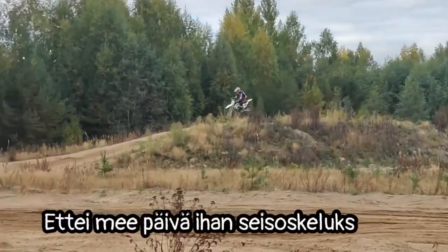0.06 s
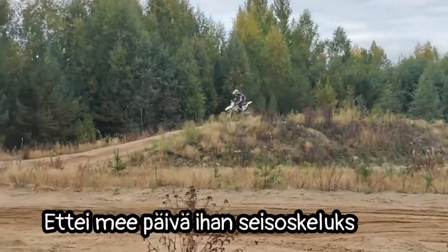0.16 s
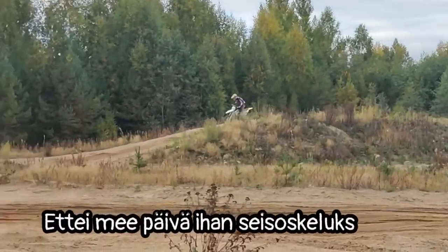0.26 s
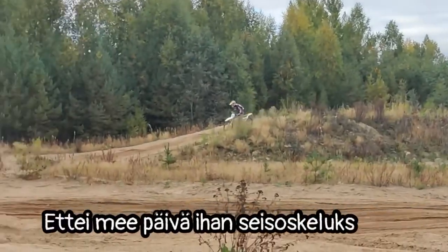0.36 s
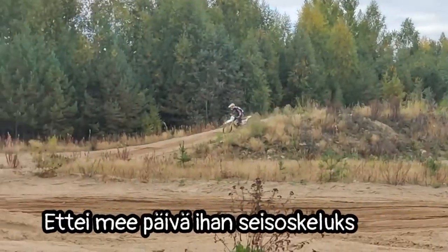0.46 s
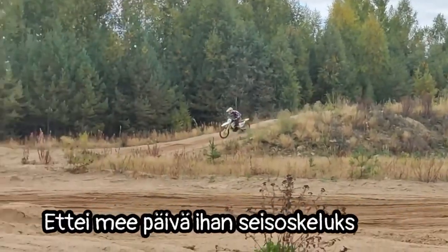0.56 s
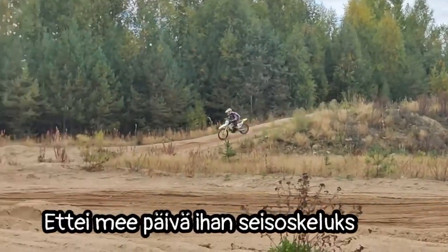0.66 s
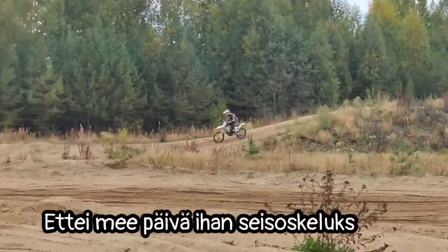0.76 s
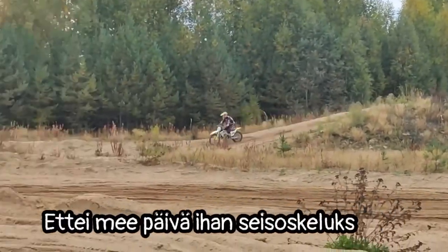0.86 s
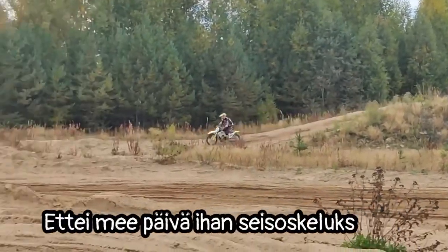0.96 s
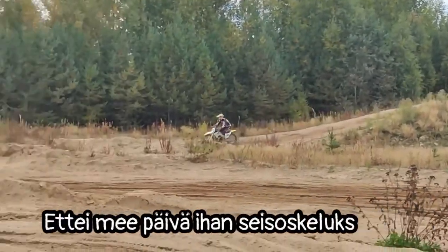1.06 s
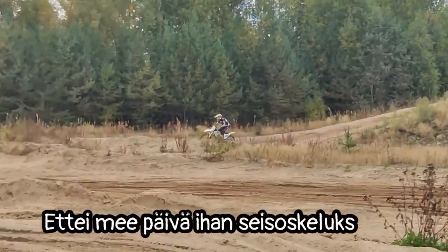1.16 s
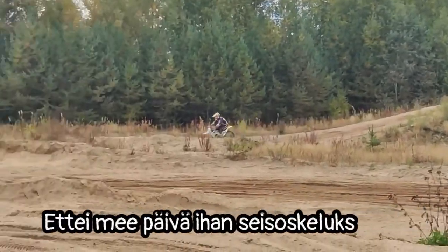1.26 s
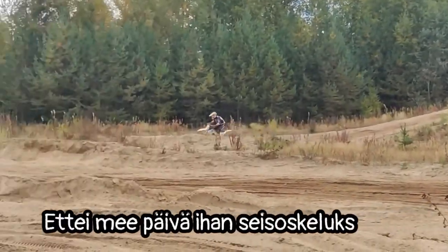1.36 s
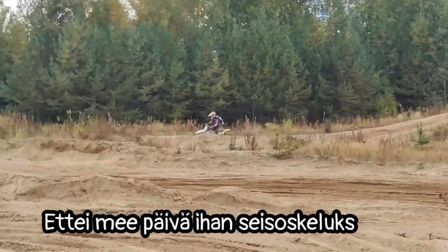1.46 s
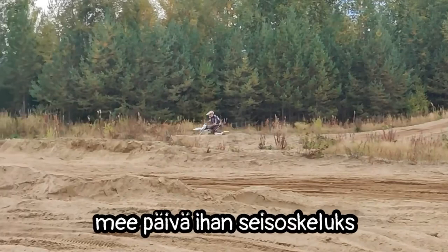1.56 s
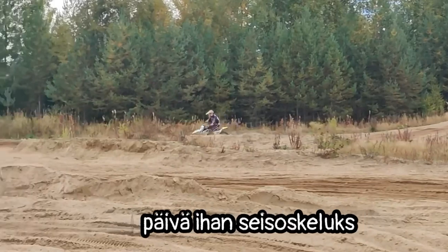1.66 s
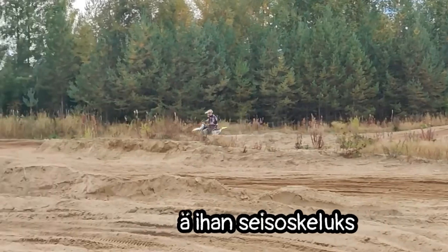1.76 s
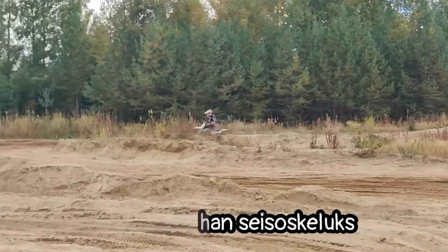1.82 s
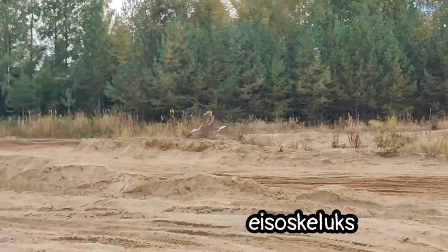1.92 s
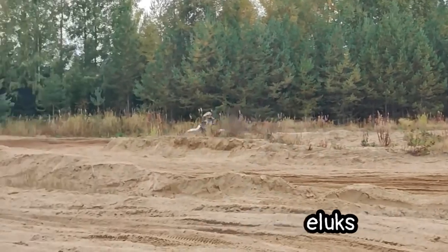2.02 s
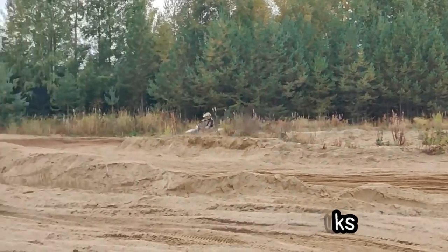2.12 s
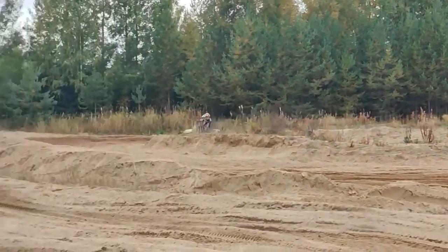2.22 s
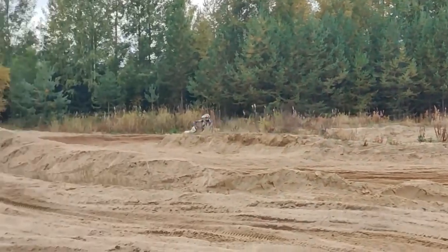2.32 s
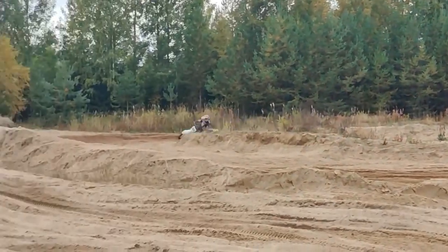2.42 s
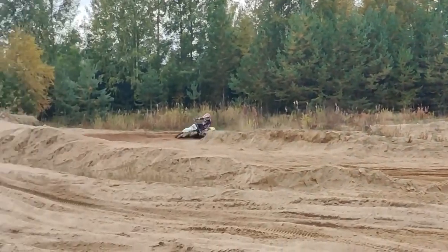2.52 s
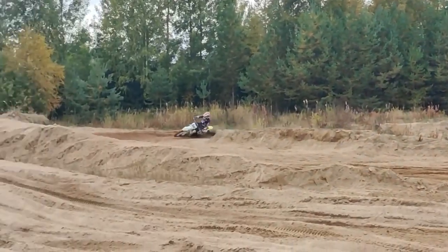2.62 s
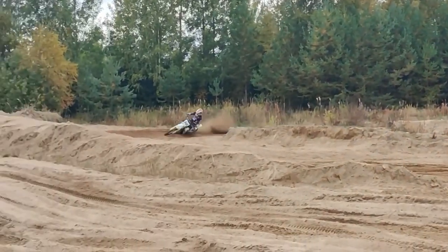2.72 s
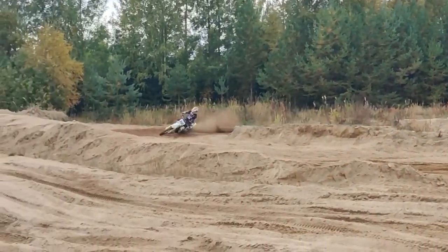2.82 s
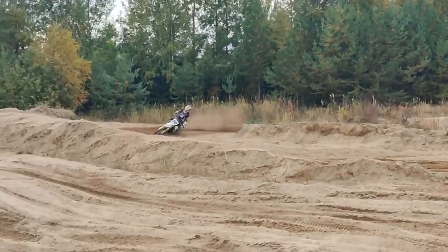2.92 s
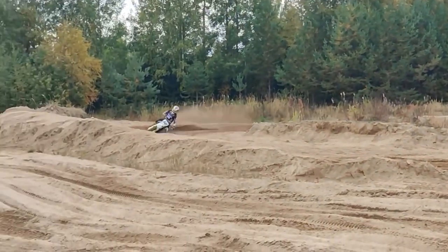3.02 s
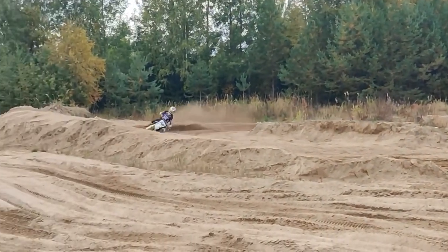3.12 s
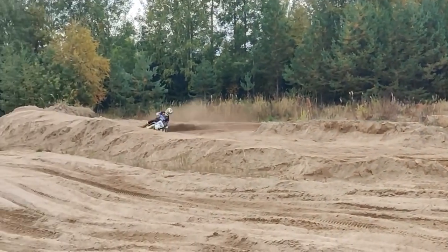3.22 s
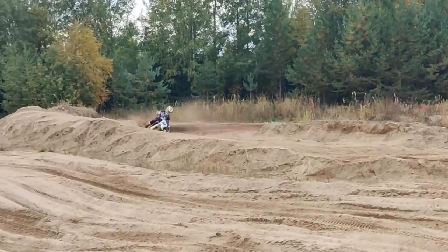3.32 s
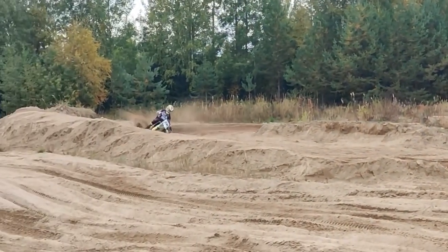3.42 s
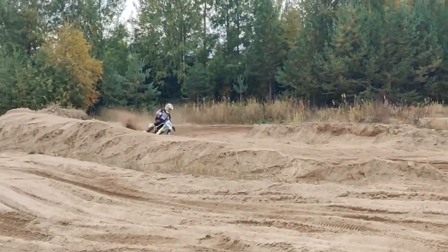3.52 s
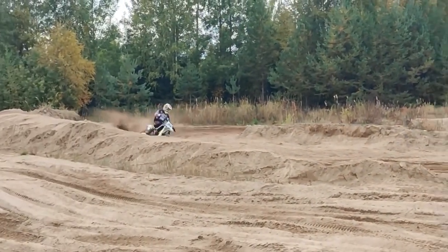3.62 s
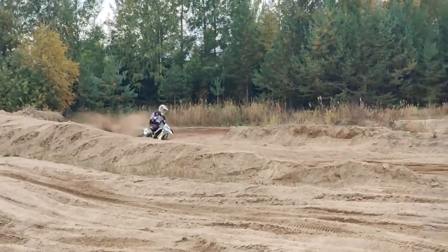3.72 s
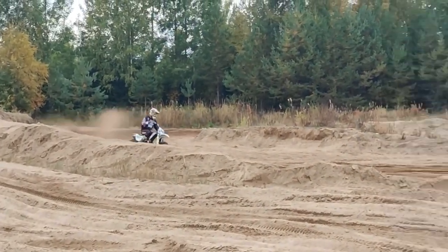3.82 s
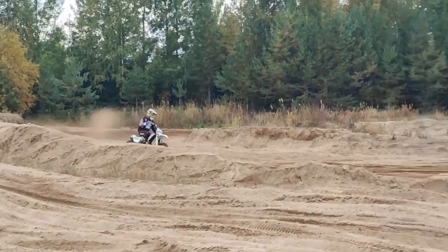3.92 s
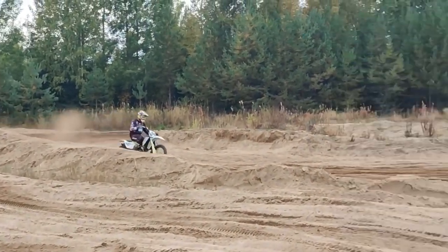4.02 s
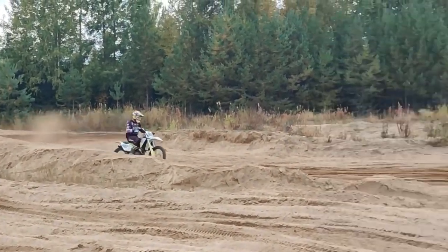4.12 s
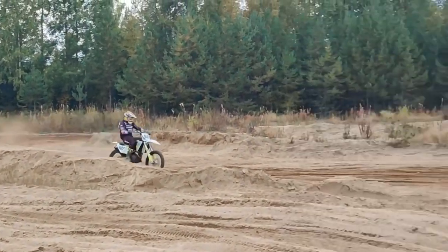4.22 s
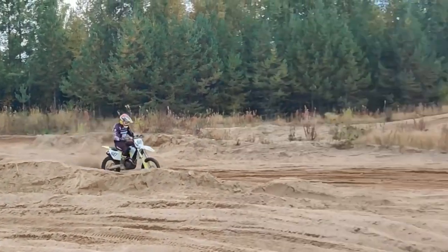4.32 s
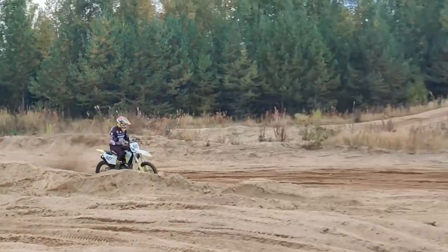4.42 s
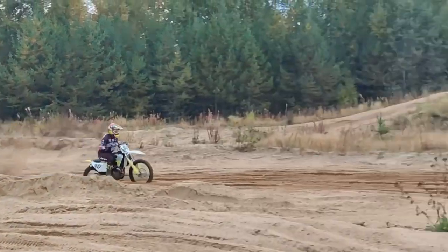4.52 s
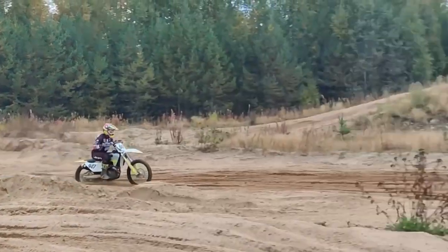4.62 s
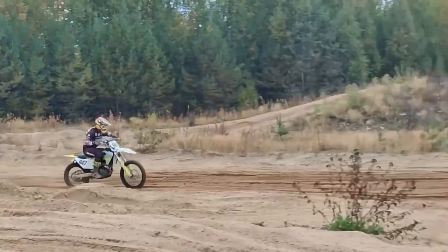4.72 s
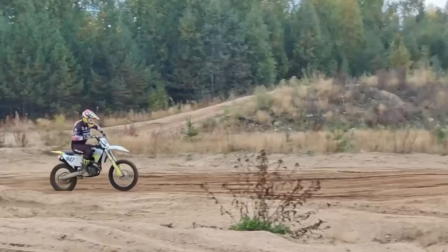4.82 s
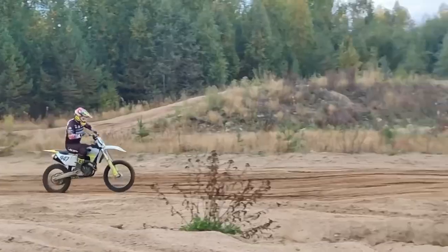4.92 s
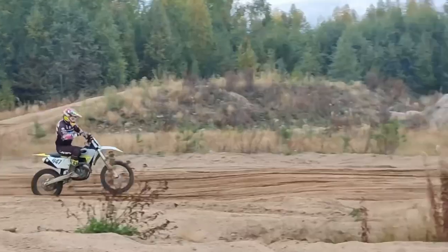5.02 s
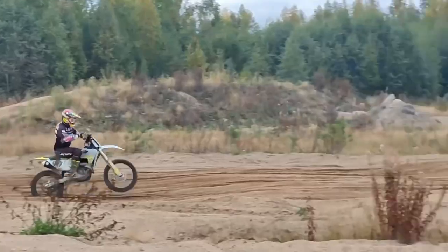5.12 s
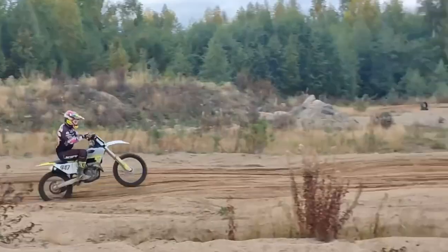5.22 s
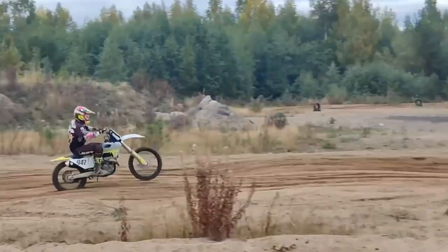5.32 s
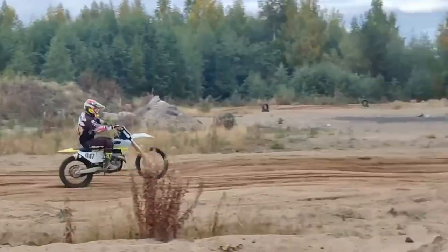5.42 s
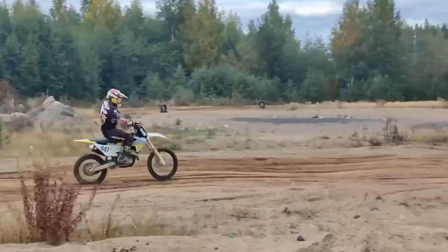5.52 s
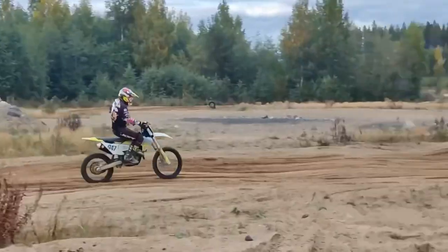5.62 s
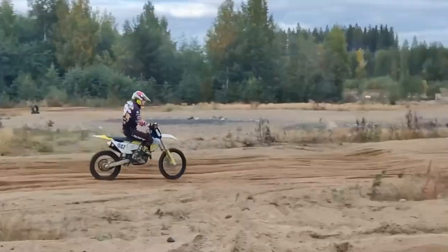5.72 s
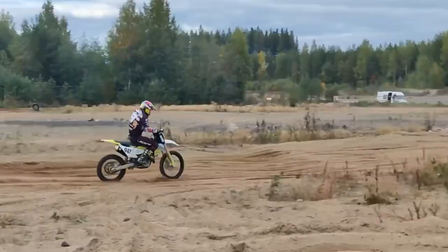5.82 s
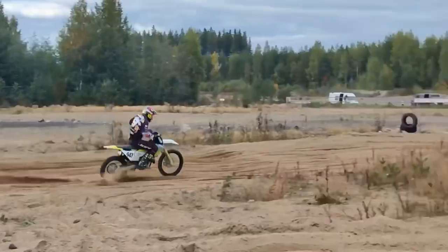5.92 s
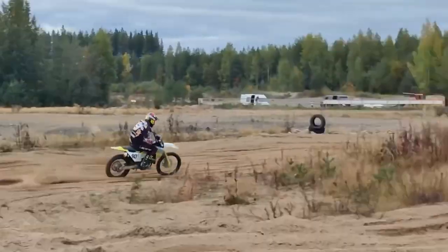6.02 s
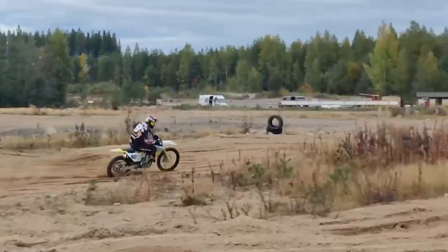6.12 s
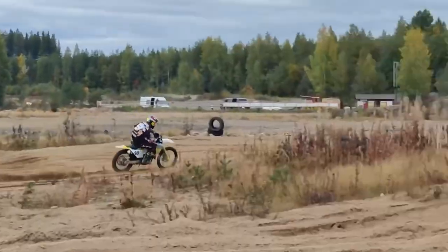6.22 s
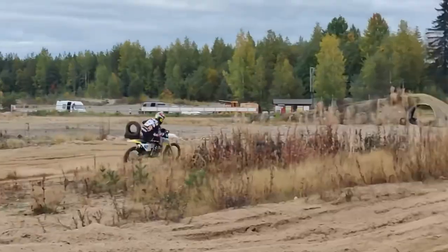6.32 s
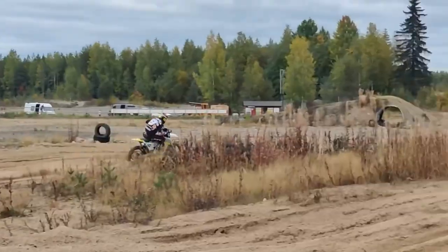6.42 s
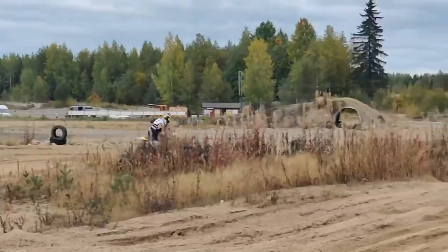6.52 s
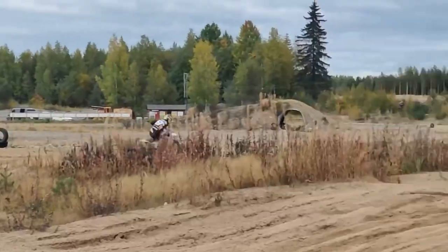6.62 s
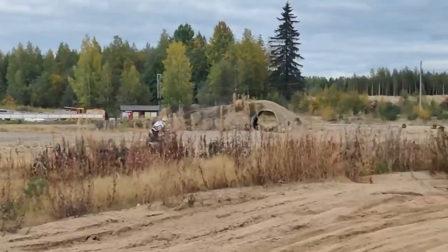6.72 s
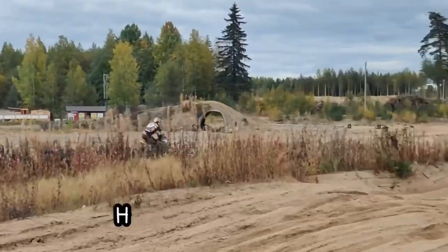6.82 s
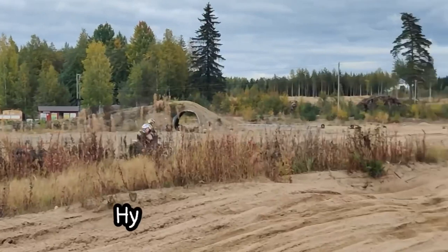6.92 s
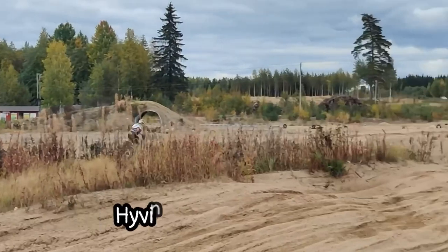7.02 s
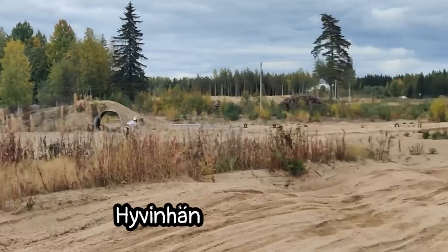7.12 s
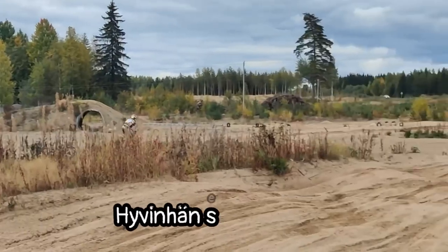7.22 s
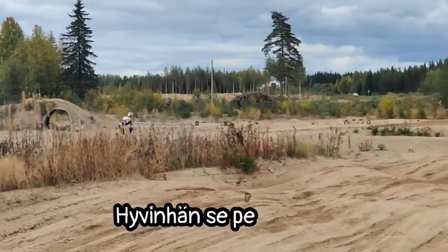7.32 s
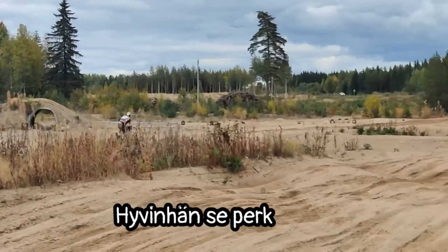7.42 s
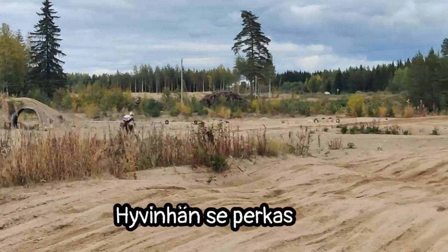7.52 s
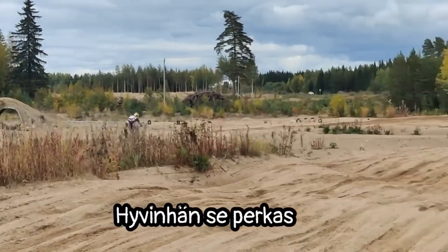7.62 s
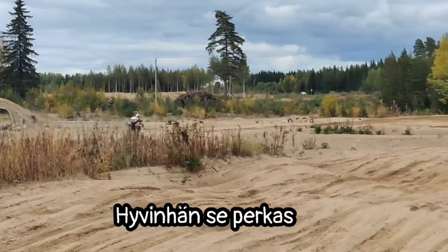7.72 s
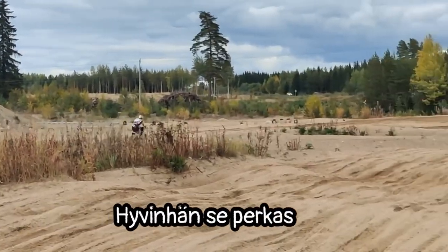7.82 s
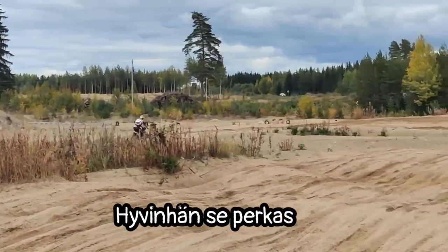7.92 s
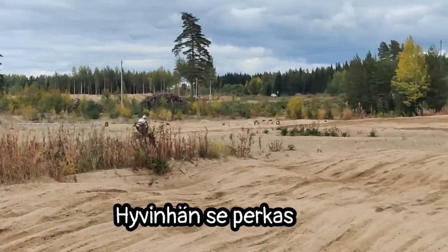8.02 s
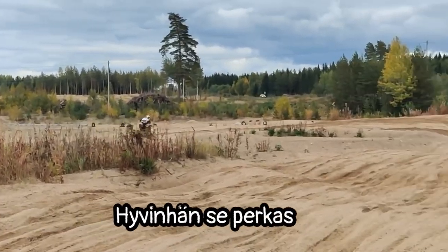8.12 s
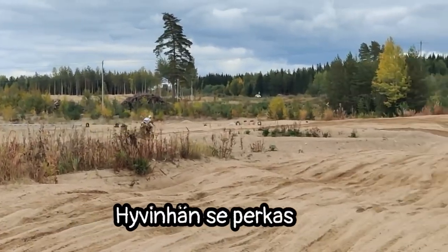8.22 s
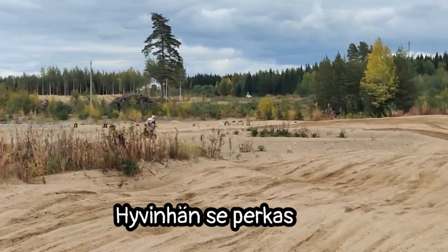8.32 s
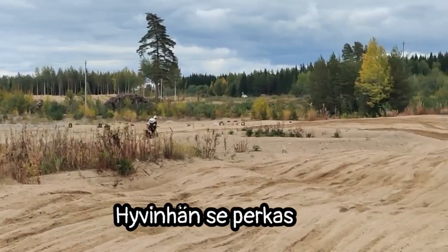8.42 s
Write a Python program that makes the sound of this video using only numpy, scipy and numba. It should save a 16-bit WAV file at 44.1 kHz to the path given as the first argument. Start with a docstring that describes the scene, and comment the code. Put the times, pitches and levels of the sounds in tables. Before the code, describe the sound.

A four-stroke dirt bike laps a sand track, revving in bursts, burbling off the throttle, passing by and riding away.

```python
"""Dirt bike on a sand track

A single-cylinder four-stroke laps tens of metres from a phone that pans after it. Each firing gives
a low exhaust boom, a sharp bark and a puff of gas; at full revs the limiter cuts sparks. Chain and
tyres hiss, the tree line echoes, and a light wind rumbles on the two microphone ports."""
import sys
import numpy as np
from scipy import signal
from scipy.fft import rfft, irfft, next_fast_len
from scipy.io import wavfile
from scipy.ndimage import uniform_filter1d
from numba import njit

SR = 44100
rng = np.random.default_rng(int(sys.argv[2]) if len(sys.argv) > 2 else 0)


def inscribe(sig):
    """Save sig as 16-bit PCM at rate SR to the path in sys.argv[1].

    A 1-D sig is mono; a 2-D sig holds one channel per row.
    Samples are clipped to [-1, 1] before scaling.
    """
    pcm = np.round(np.clip(np.atleast_2d(sig).T, -1, 1) * 32767)
    wavfile.write(sys.argv[1], SR, pcm.astype(np.int16))


N = 373086
TIME_S = np.arange(N) / SR
LIGHT_THROTTLE = .3  # opening at which the engine just pulls


def undb(db):
    """Decibels to gain."""
    return 10 ** (np.asarray(db) / 20)


def unit(x):
    """Scale to rms 1."""
    return x / np.sqrt(np.mean(x ** 2))


def curve(table):
    """The columns after time_s, interpolated to one value a sample."""
    time_s, *columns = np.transpose(table)
    return [np.interp(TIME_S, time_s, column) for column in columns]


def band(x, hz, width_hz):
    """Steep band-pass, gain 1 at the centre."""
    edges_hz = [hz - width_hz / 2, hz + width_hz / 2]
    return signal.sosfilt(signal.butter(2, edges_hz, "bandpass", fs=SR, output="sos"), x)


def wander(rate_hz):
    """Random levels held 1 / rate_hz seconds and smoothed twice; spread near 1."""
    hold, coarse = int(SR / rate_hz / 32), np.arange(0, N + 32, 32)
    held = np.repeat(rng.standard_normal(len(coarse) // hold + 1), hold)
    smooth = uniform_filter1d(uniform_filter1d(held, hold), hold)
    return 1.37 * np.interp(np.arange(N), coarse, smooth[:len(coarse)])


def port_noise(alike):
    """Noise on both microphone ports, with the share `alike` of its power in common."""
    return np.sqrt(alike) * rng.standard_normal(N) + np.sqrt(1 - alike) * rng.standard_normal((2, N))


def resonate(x, modes, wander_db=1.6):
    """Resonances that each swell and fade on their own; neighbours swing against each other."""
    return unit(sum((-1) ** k * undb(db + wander_db * wander(15)) * band(x, hz, width_hz)
                    for k, (hz, width_hz, db) in enumerate(modes)))


@njit
def moving_band(x, tuning, damping):
    """State-variable band-pass with a moving centre, gain 1 there."""
    out, band_state, low_state = np.empty(len(x)), 0., 0.
    for i in range(len(x)):
        g = tuning[i]
        passed = (band_state + g * (x[i] - low_state)) / (1 + g * (g + damping[i]))
        band_state = 2 * passed - band_state
        low_state += 2 * g * passed
        out[i] = damping[i] * passed
    return out


def sliding_ring(x, hz, width_hz):
    """Steep moving resonance on both ports."""
    tuning, damping = np.tan(np.pi * hz / SR), width_hz / hz
    return np.array([moving_band(moving_band(port, tuning, damping), tuning, damping) for port in x])


# Wind at the microphone: time_s, level_db
WIND_LEVEL = [(0, -32), (.9, -41), (1.2, -44), (2.7, -46), (3.7, -32), (4.7, -34), (5.1, -50), (6.4, -50),
              (7.3, -40), (7.8, -35), (8.46, -38)]
def wind():
    """Gusts rumble on the ports, only partly alike on the two."""
    return undb(curve(WIND_LEVEL)[0] + 4 * wander(6)) * unit(band(port_noise(.15), 32, 43))


def tree_echo(x, t60_s=.5, level_db=-14):
    """The tree line scatters back a decaying tail without bass, different at each port."""
    t = TIME_S[:SR // 2]
    tail = rng.standard_normal((2, N))[:, :len(t)] * np.exp(-np.log(1000) * t / t60_s) * (t > .02)
    tail /= np.sqrt(np.sum(tail ** 2, axis=1, keepdims=True))
    return undb(level_db) * signal.fftconvolve(x, band(tail, 2900, 5300), axes=1)[:, :N]


def ground_echo(x, gain, lag_s=.00146):
    """The dirt between bike and microphone adds a mirror image with a drifting lag."""
    samples = np.arange(N)
    delayed = samples - lag_s * (1 + .05 * wander(5)) * SR
    mirrored = np.array([np.interp(delayed, samples, port) for port in x])
    return (x + gain * mirrored) / np.hypot(1, gain)


# Top treble, dull when the bike is far off: time_s, over_hiss_db
TREBLE_LEVEL = [(0, -37), (1, -38.5), (2.2, -25.5), (3.3, -32), (4.7, -23), (5.6, -24.5), (6.8, -26.5),
                (7.2, -30), (8.46, -28.5)]
def top_treble(air, hiss_db):
    """The flickering top of the hiss, around 9 kHz."""
    level_db = hiss_db + curve(TREBLE_LEVEL)[0] + 2.2 * wander(14)
    return undb(level_db) * unit(band(air + .5 * rng.standard_normal((2, N)), 9300, 5400))


# Bands of the chain and tyre hiss: pitch_hz, width_hz, level_db
HISS_BANDS = [(2990, 1630, 10), (3830, 1200, 4.5), (6275, 1290, 1.5)]
def chain_and_tyres(air, rasp_hz, rasp_db):
    """Chain and tyres hiss in three steady bands and one sliding rasp."""
    hiss = resonate(air, HISS_BANDS)
    rasp = unit(sliding_ring(air, rasp_hz, width_hz=1500))
    return unit(undb(-rasp_db / 2) * hiss - undb(rasp_db / 2) * rasp)


def gas_puffs(clicks, crack, gate, load, lower_hz, upper_hz, balance_db):
    """Each puff of gas sounds two rings of the tail pipe over a broad rush."""
    blast = 2.8 * crack * clicks + .42 * gate * port_noise(.7)
    lower = undb(1.6 * wander(5.8) + balance_db / 2) * sliding_ring(blast, lower_hz, width_hz=520)
    upper = undb(1.6 * wander(5.8) - balance_db / 2) * sliding_ring(blast, upper_hz, width_hz=420)
    rush = unit(band(1.3 * crack * clicks + gate * port_noise(.7), 2000, 1300))
    return unit(unit(lower - upper) + (.7 - .4 * load) * rush)


def silencer_chambers(x, lags_s=(.0006, .0014), gain=.45):
    """The chambers repeat each pressure front as all-pass echoes, spreading it over a few ms."""
    for lag_s in lags_s:
        taps = np.zeros(int(lag_s * SR) + 1)
        taps[0], taps[-1] = -gain, 1
        x = signal.lfilter(taps, taps[::-1], x)
    return x


# Lower and upper resonances of the silencer: pitch_hz, width_hz, level_db
SILENCER_LOW = [(468, 267, -7), (665, 186, 4)]
SILENCER_HIGH = [(889, 710, -2.5), (1270, 240, 3)]
def exhaust_bark(clicks, bare_fronts, crack, gate, tilt_db, notch_hz=547, spike_db=-2):
    """Pressure fronts ring the silencer, thinned at its first notch; the bare front adds a spike."""
    front = (.15 + 1.7 * crack) * clicks + .33 * gate * port_noise(.75)
    lower = undb(-tilt_db / 2) * resonate(front, SILENCER_LOW)
    upper = undb(tilt_db / 2) * resonate(front, SILENCER_HIGH)
    bark = unit(lower + upper)
    bark = .45 * bark + .55 * signal.lfilter(*signal.iirnotch(notch_hz, 7, SR), bark)
    return bark + undb(spike_db) * unit(band(bare_fronts, 1700, 2200))


# What the pipe passes on shut, barely open and wide open throttle: pitch_hz, level_db
PIPE_SHUT = [(40, -43.5), (60, -39), (85, -27), (110, -25.5), (134, -21), (156, -26), (180, -33.5),
             (210, -38), (260, -41), (330, -39.5), (500, -63.5)]
PIPE_LIGHT = [(40, -34), (55, -26), (70, -22), (95, -24.5), (120, -24.5), (150, -29), (190, -42),
              (240, -40), (300, -41.5), (370, -33), (500, -39)]
PIPE_OPEN = [(40, -48.5), (60, -28), (90, -19), (118, -19), (138, -7.5), (160, -19.5), (185, -12.5),
             (230, -14), (300, -13.5), (350, -21), (400, -30), (460, -46), (500, -33)]
# A dip in the open-throttle boom, probably the echo off the ground: time_s, pitch_hz, depth_db
PATH_DIP = [(0, 195, 21), (1, 183, 15.5), (2.5, 320, 6), (3.7, 360, 17), (4.05, 331, 21.5), (4.4, 291, 4.5),
            (4.75, 248.2, 16), (5.45, 226.1, 28), (5.7, 226, 6.5), (6.8, 194, 1.5), (7.2, 221.7, 22),
            (8.46, 218.6, -5)]
# Lift of the first order over the rest of the boom: time_s, level_db
FIRST_ORDER_LIFT = [(0, -3), (.9, -2.5), (1.2, 6), (2.4, 5.5), (3.1, 1), (3.7, 0), (4.7, 1.5), (5.2, 0),
                    (6.8, 2), (7.1, 1), (7.55, 3), (7.7, 1), (8.2, 3), (8.35, 6), (8.46, 0)]
# Lag behind the firing of orders 1, 2, 3 and all higher ones, each in its own cycle: lag_turns
ORDER_LAG = [-0.062, -0.064, 0.18, 0.083]
def exhaust_boom(firing_hz, turns, load, limiting, dip_octaves=.31):
    """Clean low orders of the firing rate, each as strong as the pipe passes its pitch."""
    boom, slow = 0, slice(0, N, 32)  # levels move slowly
    dip_hz, dip_db = np.array(curve(PATH_DIP))[:, slow]
    first_db = (curve(FIRST_ORDER_LIFT)[0] - 3 * limiting)[slow]  # weaker while sparks are cut
    pulling = np.clip(load[slow] / LIGHT_THROTTLE, 0, 1)
    wide = np.clip((load[slow] - LIGHT_THROTTLE) / (1 - LIGHT_THROTTLE), 0, 1)
    for order in range(1, 11):
        pitch_hz = order * firing_hz[slow]
        shut, light, full = (np.interp(np.log(pitch_hz), np.log(hz), db)
                             for hz, db in map(np.transpose, (PIPE_SHUT, PIPE_LIGHT, PIPE_OPEN)))
        full -= dip_db * np.exp(-(np.log2(pitch_hz / dip_hz) / dip_octaves) ** 2)
        level_db = shut + pulling * (light - shut) + wide * (full - light)
        level_db += (order == 1) * first_db - .98 * max(order - 4, 0)
        level_db += 1.6 * (2 - pulling) * wander(14)[slow]
        fade = np.clip((500 - pitch_hz) / 60, 0, 1)  # orders end below the silencer's first notch
        gain = np.interp(TIME_S, TIME_S[slow], fade * undb(level_db))
        boom += gain * np.cos(2 * np.pi * (order * turns - ORDER_LAG[min(order, 4) - 1]))
    return np.sqrt(2) * boom


# Twists of the throttle: open_s, shut_s, opening_share, ramp_s, bite_db
TWISTS = [(0, 0.184, 0.22, 0.0045, -0.5), (0.185, 0.583, 0.85, 0.04, -5), (0.533, 0.932, 0.8, 0.025, 6),
          (1.317, 1.536, 0.21, 0.0078, -1), (1.733, 2.445, 0.24, 0.0091, -4.5),
          (2.371, 3.302, 0.75, 0.18, 4.5), (3.217, 4.804, 0.9, 0.014, 1), (4.623, 5.455, 0.89, 0.036, 1),
          (5.4, 5.614, 0.89, 0.0393, -2), (5.586, 5.821, 0.89, 0.021, 7.5),
          (5.77, 5.935, 0.73, 0.02137, -1), (5.917, 6.12, 0.88, 0.013, 5), (6.089, 6.211, 0.75, .04, 2),
          (6.18, 6.643, 0.86, 0.051, 4), (6.56, 6.78, 0.88, 0.05, 1), (7.486, 7.568, 0.82, 0.11, 4.5),
          (8.257, 8.336, 0.6, 0.028, 8)]
def throttle(closing_s=.054, bite_s=.22):
    """Each twist ramps open, holds and shuts; its bite lifts or lowers the level at first."""
    t = np.arange(0, N + 32, 32) / SR
    load, bite_db = np.zeros((2, len(t)))
    for open_s, shut_s, opening, ramp_s, db in TWISTS:
        rise = (t - open_s) / max(ramp_s, .005)
        shape = np.clip(np.minimum(rise, 1 - (t - shut_s) / closing_s), 0, 1)
        load = np.maximum(load, opening * shape)
        bite_db += db * shape * np.exp(-np.maximum(t - open_s, 0) / bite_s)
    return curve(np.transpose([t, load, bite_db]))


# Spells on the rev limiter: start_s, end_s, cut_db
LIMITER_SPELLS = [(0.323, 0.516, 3), (4.317, 4.505, 4.5), (5.81, 5.93, 4)]
def firings(firing_hz, load, scatter_db=.48):
    """Firings come early or late, more on the overrun; the limiter weakens two in every three."""
    jitter_turns = .0065 + .02 * np.clip(1 - load / LIGHT_THROTTLE, 0, 1)
    turns = np.cumsum(firing_hz) / SR + jitter_turns * wander(40) + 1
    cycle = turns.astype(int)
    strength_db = scatter_db * rng.standard_normal(N // 100)[cycle]
    limiting = np.zeros(N)
    for start_s, end_s, cut_db in LIMITER_SPELLS:
        spell = (TIME_S > start_s) & (TIME_S < end_s)
        strength_db -= cut_db * spell * ((cycle % 3 > 0) - .5)
        limiting += spell
    return turns, strength_db, uniform_filter1d(limiting, size=600)


# Late charges popping in the pipe: start_s, over_firing_db
PIPE_POPS = [(1.759, 13), (2.054, 3), (2.126, 7.5), (5.853, 7), (5.901, 3.5)]
def pressure_fronts(firing_hz, turns, strength):
    """One click a firing or pop; fewer firings a second carry the same power in bigger clicks."""
    step = firing_hz / SR
    fired = np.diff(turns.astype(int), prepend=0) * strength / np.sqrt(step)
    spill = np.clip(turns % 1 / step, 0, 1)  # each click is shared between two samples
    clicks = fired * (1 - spill) + np.roll(fired * spill, -1)
    for start_s, db in PIPE_POPS:
        at = int(start_s * SR)
        clicks[at] += undb(db) / np.sqrt(step[at])
    return clicks


# How far single firings stand out of the noise, open throttle at 90 Hz and shut: time_s, crack_share
CRACK_PULLING = [(0, .55), (1, .45), (2.4, .26), (2.9, .16), (3.3, .36), (4.2, .62), (4.6, .8), (4.9, .82),
                 (5.1, .6), (6, .74), (6.8, .68), (7.5, .9)]
CRACK_COASTING = [(0, .06), (7.5, .08), (7.62, .26), (7.9, .22), (8.05, .06), (8.46, .1)]
def pulsing(firing_hz, turns, strength, load, swell_s=.0013):
    """Firings crack more when the engine lugs; gas swells behind each front and gates the noise."""
    coasting = curve(CRACK_COASTING)[0]
    pulling = curve(CRACK_PULLING)[0] + .01 * (90 - firing_hz)
    crack = np.clip(coasting + load ** 1.5 * (pulling - coasting), 0, .97)
    age = turns % 1 / firing_hz / swell_s
    puff = unit(strength * age * np.exp(-age) / np.sqrt(firing_hz / 90))
    return crack, crack * puff + 1 - .7 * crack ** 2


# Engine speed as heard from the trackside: time_s, firing_hz
ENGINE_SPEED = [(0, 96), (.19, 79.45), (.23, 91.3), (.33, 115.1), (.47, 113.5), (.57, 94.3), (.7, 84.6),
                (.8, 88.3), (.89, 106.6), (.96, 91.4), (1.04, 66.4), (1.2, 48.4), (1.3, 42.83),
                (1.53, 64.4), (1.6, 60.23), (1.77, 39.02), (1.88, 47.22), (2.24, 60.1), (2.33, 71.8),
                (2.49, 95.4), (2.57, 75.3), (2.66, 69.25), (2.78, 78.74), (3.06, 96.3), (3.25, 91.86),
                (3.49, 76), (3.7, 91), (3.86, 98.8), (4.19, 91), (4.26, 97.2), (4.33, 116.5), (4.48, 113.5),
                (4.52, 94.1), (4.73, 69.4), (4.85, 86.35), (5.09, 108), (5.32, 81.15), (5.44, 75.23),
                (5.61, 97.15), (5.89, 110), (5.94, 104.5), (6.08, 86.86), (6.2, 93.84), (6.27, 79.3),
                (6.39, 90.43), (6.46, 88.3), (6.6, 100.1), (6.74, 104.4), (6.78, 101.5), (6.88, 71.47),
                (7.12, 44.76), (7.21, 39.47), (7.47, 44.85), (7.63, 68.33), (7.82, 58.77), (7.96, 43.93),
                (8.2, 38.93), (8.34, 55.95), (8.39, 59), (8.46, 59.25)]
# Layer gains as the bike moves and turns, on open and on shut throttle, at 90 firings a second:
# time_s, boom_db, bark_db, gas_db, hiss_db
LEVELS_PULLING = [(0, -6, -16.5, -30.5, -9), (.35, 13.5, -19.5, -26.5, -28), (.55, 2, -27, -31, -30),
                  (.9, 8, -26.5, -26, -29), (2.45, 1, -31.5, -42, -25), (2.6, -7, -19, -21, -22),
                  (2.75, 0, -18.5, -15.5, -14), (3.0, 2, -20, -20.5, -23), (3.3, 0, -22.5, -21.5, -24),
                  (3.5, -1.5, -15.5, -13.5, -20), (3.7, -2.5, -24, -19, -21.5), (3.9, -4, -23, -22.5, -18),
                  (4.4, -4.5, -32.5, -26, -24), (4.6, -5.5, -27.5, -20.5, -16.5),
                  (4.8, -6.5, -23.5, -12, -10.5), (4.95, -5, -27, -22.5, -21.5),
                  (5.1, 0.5, -24.5, -20.5, -17.5), (5.45, -2.5, -17.5, -11.5, -11),
                  (5.65, -4, -29.5, -30, -26), (6.05, -6.5, -31.5, -27.5, -24), (6.3, -7, -25, -31, -19),
                  (6.75, 3, -33.5, -34, -28.5), (7.55, 1.5, -25, -21, -21.5), (8.3, -9, -31.5, -59, -27.5)]
LEVELS_COASTING = [(0, 3, -27.5, -26.5, -33), (1.1, 5, -16, -18, -19), (1.25, -0.5, -14, -18, -21.5),
                   (1.28, -5.5, -13.5, -19, -27.5), (1.58, -1, -22.5, -26, -29.5),
                   (1.72, -0.5, -16.5, -18.5, -24.5), (1.85, -4, -8.5, -19.5, -24.5),
                   (2.3, -3, -21.5, -24.5, -36), (5.5, 27.5, -55, -63, -57),
                   (7.1, -3.5, -21.5, -20.5, -22.5), (7.4, -2.5, -18, -21, -26.5), (7.65, 1, -27, -38, -32),
                   (7.85, 1.5, -25.5, -36.5, -28.5), (7.98, -2.5, -17.5, -24.5, -22.5),
                   (8.1, -6.5, -15, -23, -29.5), (8.46, 4.5, -23, -31, -24)]
# How the pipe faces the microphone: time_s, upper_over_lower_bark_db, lower_over_upper_ring_db
PIPE_FACING = [(0, -6, -1), (.4, -1, 0), (.9, 0.5, -4), (1.3, -5.5, -4), (2.1, -2.5, 2), (2.6, -2, 1.5),
               (3.05, -6, 4), (3.4, -2, -4.5), (4.2, 2, 4.5), (4.38, 1, -8), (4.75, 6.5, 4.5), (5.0, -2, 1),
               (5.3, -2.5, -4.5), (5.7, -2, -6), (6.08, 3, -11.5), (6.4, -8.5, -12.5), (6.75, -7, -10.5),
               (7.5, -10, 1), (8.46, -9, 6)]
# Rings sliding as the pipe turns: time_s, lower_hz, upper_hz, rasp_hz, rasp_over_hiss_db
RING_SLIDE = [(0.2, 1753, 2300, 4700, -13), (0.68, 1460, 2110, 4350, -14.5), (0.75, 1700, 2140, 5420, -19),
              (1.11, 1750, 2440, 4620, -10), (1.2, 1800, 2290, 5100, -10.5), (1.3, 1740, 2270, 4300, -12),
              (2.14, 1590, 2350, 5100, -14), (2.6, 1610, 2260, 4330, -11.5), (3.6, 1680, 2325, 4880, -11.5),
              (4.17, 1680, 2360, 4760, -3.5), (4.56, 1767, 2440, 4880, -1.5),
              (5.75, 1650, 2200, 4700, -5.5), (6.11, 1840, 2260, 4980, -4.5),
              (6.64, 1455, 2236, 4670, -5.5), (7.37, 1810, 2370, 4700, -5.5), (7.55, 1430, 2150, 4670, 0),
              (7.99, 1780, 2330, 4800, -2), (8.4, 1545, 2290, 4770, 2.5)]
def dirt_bike(nearness):
    """One train of firings drives boom, bark, gas and hiss, balanced by throttle and place on the lap."""
    firing_hz = curve(ENGINE_SPEED)[0]
    load, bite_db = throttle()
    levels_db = load * curve(LEVELS_PULLING) + (1 - load) * curve(LEVELS_COASTING) + bite_db
    levels_db[1:] += np.outer([.4369, .3977, .3363], firing_hz - 90)  # dB per Hz: louder with the revs
    boom_db, bark_db, gas_db, hiss_db = levels_db
    turns, strength_db, limiting = firings(firing_hz, load)
    crack, gate = pulsing(firing_hz, turns, undb(strength_db), load)

    boom = undb(boom_db) * exhaust_boom(firing_hz, turns, load, limiting)
    boom *= uniform_filter1d(undb(1.3 * strength_db), size=120)
    boom *= undb(1.9 * (1 - crack) ** 2 * wander(45))  # uneven burning burbles on the overrun

    fronts = pressure_fronts(firing_hz, turns, undb(strength_db))
    bare = nearness * crack ** 2  # close to the microphone a hard front arrives unblurred
    clicks = bare * fronts + (1 - bare) * silencer_chambers(fronts)
    tilt_db, balance_db = curve(PIPE_FACING)
    lower_hz, upper_hz, rasp_hz, rasp_db = curve(RING_SLIDE)
    bark = exhaust_bark(clicks, bare * fronts, crack, gate, tilt_db)
    gas = gas_puffs(clicks, crack, gate, load, lower_hz, upper_hz, balance_db)
    air = 1.6 * crack * clicks + (.45 * gate + .13) * port_noise(.35)
    hiss = chain_and_tyres(air, rasp_hz, rasp_db)

    body = sum(undb(db + 1.2 * wander(45)) * layer  # each layer flutters on its own
               for db, layer in ((bark_db, bark), (gas_db, gas), (hiss_db, hiss)))
    body = ground_echo(body, gain=-.3 * load)  # the diffuse overrun has no comb
    body = signal.sosfilt(signal.butter(4, 6800, fs=SR, output="sos"), body)
    return boom + body + top_treble(air, hiss_db)


# The phone's two microphone ports: pitch_hz, left_over_right_db, left_lead_rad
PORT_COLOUR = [(100, 0, .05), (350, -.6, .15), (520, 0, .35), (700, 2, .35), (900, 0, .5), (1200, -4, 1.1),
               (1380, -1, 2.4), (1550, 1.5, 0), (1900, -4, 1.2), (2070, -3.5, 0), (2600, -4, 1.9),
               (3100, -5, 2.8), (3800, -3, 4), (4500, -4.5, 4.2), (5200, -1, 6.3), (5900, 7, 7.7),
               (6600, 0, 8.5), (12000, -.5, 14)]
def microphone_ports(x):
    """The phone body gives each port its own colour and lag."""
    size = next_fast_len(N + SR // 10)
    hz, db, lead_rad = np.transpose(PORT_COLOUR)
    log_bins = np.log(np.fft.rfftfreq(size, 1 / SR) + 1)
    left = undb(np.interp(log_bins, np.log(hz), db) / 2)
    left = left * np.exp(.5j * np.interp(log_bins, np.log(hz), lead_rad))
    return irfft(rfft(x, size) * np.array([left, 1 / left]), size)[:, :N]


# How close the bike is to the microphone: time_s, nearness_share
BIKE_NEARNESS = [(0, .4), (2.8, .3), (3.7, .9), (4.7, .6), (5.2, .75), (6.8, .8), (7.3, .5), (8.46, .6)]
def scene():
    """From the trackside: the bike, its echo off the trees, weaker when it is close, and the wind."""
    nearness = curve(BIKE_NEARNESS)[0]
    bike = dirt_bike(nearness)
    echo = tree_echo(bike * undb(-6 * nearness))
    return microphone_ports(bike + echo) + wind()


def record(dry, top_hz=15385):
    """The phone rounds the loudest peaks and cuts the top."""
    rounded = np.tanh(.94 * dry) / 1.118
    return signal.sosfilt(signal.ellip(8, .2, 70, top_hz, fs=SR, output="sos"), rounded)


dry = scene()
out = record(dry)
inscribe(out)
```